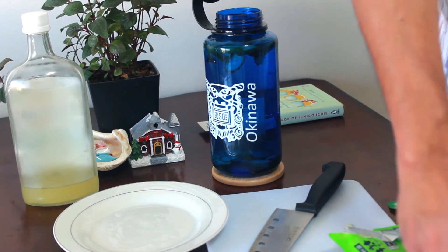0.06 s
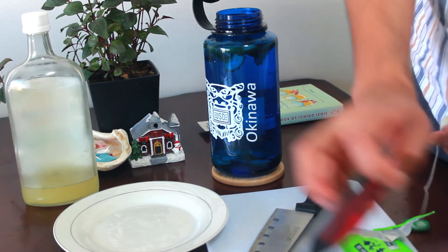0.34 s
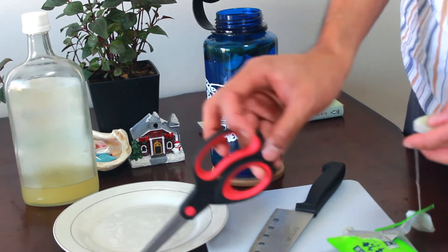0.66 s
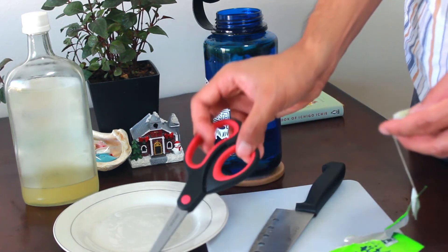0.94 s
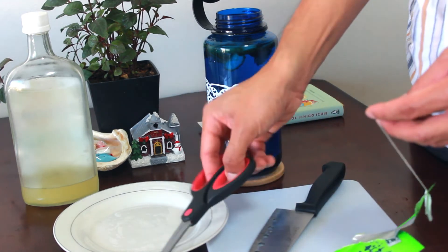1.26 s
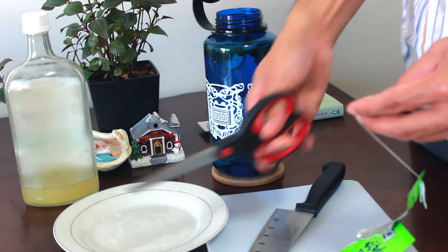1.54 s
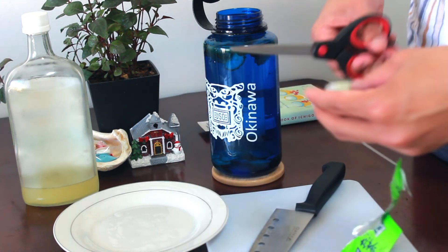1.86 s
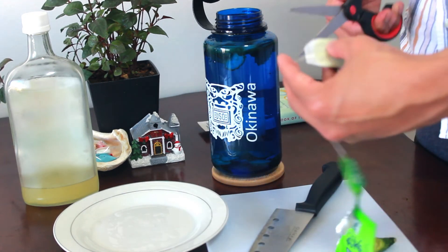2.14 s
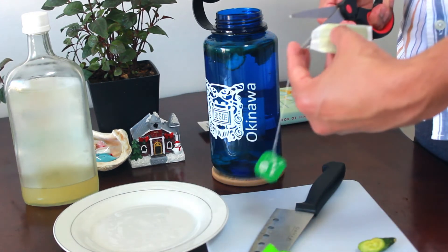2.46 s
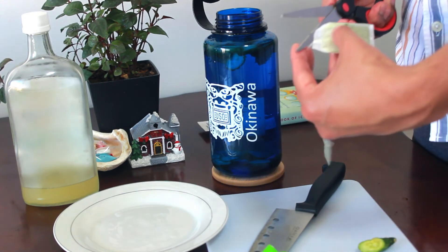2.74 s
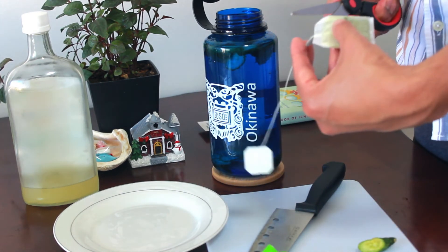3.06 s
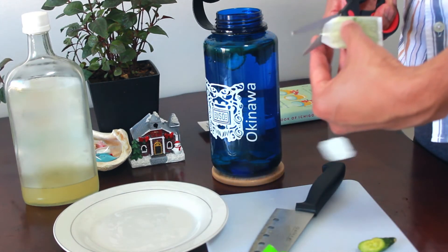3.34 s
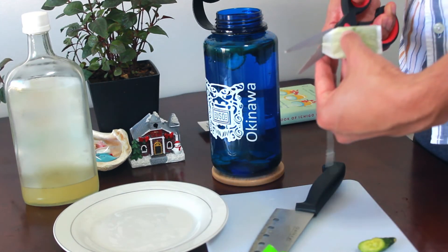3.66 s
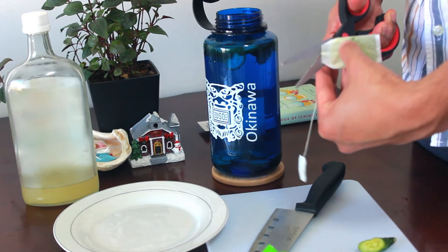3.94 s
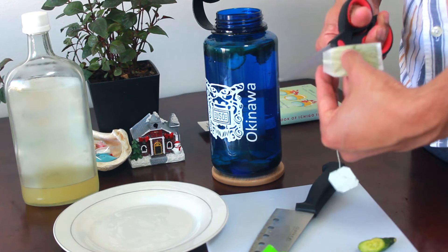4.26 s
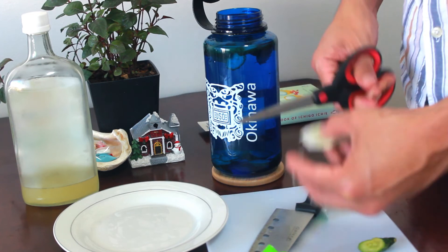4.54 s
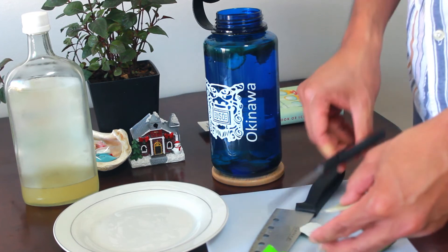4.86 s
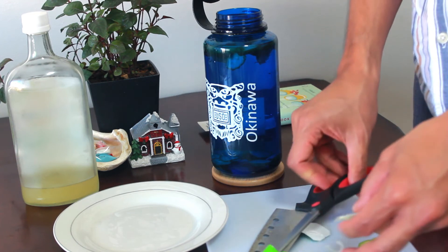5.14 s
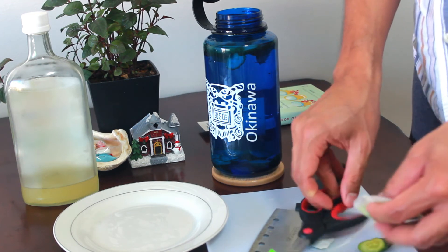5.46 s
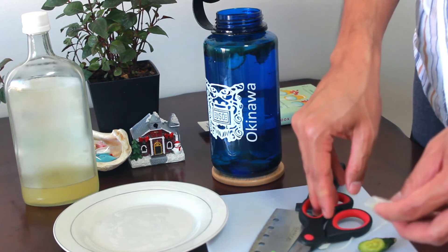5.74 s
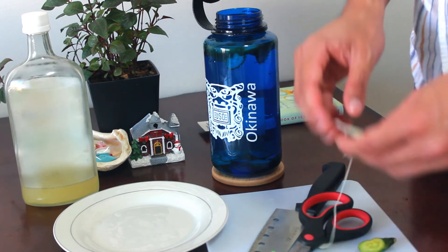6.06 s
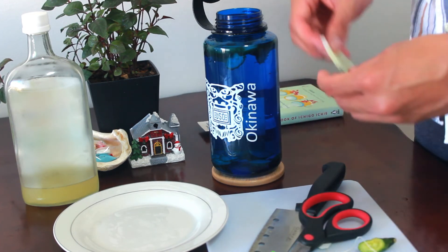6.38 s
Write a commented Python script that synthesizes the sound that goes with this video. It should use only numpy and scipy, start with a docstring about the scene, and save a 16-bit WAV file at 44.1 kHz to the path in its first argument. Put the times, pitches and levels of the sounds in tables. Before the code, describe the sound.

A low hum and soft air fill a small, fairly live room, heard from a close microphone. Right at the start, kitchen scissors knock on a wooden table and are dragged off it with rubbing scrapes that swell. At about 0.7 seconds their tip strikes the rim of a china plate with a bright, ringing clink, the loudest sound, followed by a soft bump and a duller, quieter clink at 1.2 seconds. Between 2 and 2.5 seconds the blades make a few short, light snips at a tea bag's string. After a pause, fainter strokes and ticks come from about 4.1 to 5.2 seconds. At 5.3 seconds the scissors are laid on a plastic cutting board: the steel blades clack, ring briefly and skid, and the handles drop with a click near 5.6 seconds. From 5.8 seconds to the end at about 6.5, the hum climbs and brightens.

```python
"""A low hum and soft air fill a small, fairly live room; one microphone is close by.
Kitchen scissors knock on a wooden table and are dragged off it, with rubbing scrapes that swell.
Their tip clinks twice on a china plate, rim then well, and from 2 s the edges snip a tea bag's string.
After a few fainter strokes they are laid on a plastic cutting board at 5.3 s: the steel blades
land, ring and skid, then the handles drop. At the very end the hum climbs and brightens."""
import sys
import numpy as np
from scipy import signal
from scipy.fft import rfft, irfft
from scipy.io import wavfile
from scipy.ndimage import uniform_filter1d

SR = 44100
rng = np.random.default_rng(int(sys.argv[2]) if len(sys.argv) > 2 else 0)


def materialize(psi):
    """Save the field psi as 16-bit PCM at rate SR to the path in sys.argv[1].

    A 1-D psi becomes a single channel; in a 2-D psi each row is a channel.
    """
    bounded = np.clip(np.atleast_2d(psi).T, -1, 1)
    quanta = np.round(bounded * 32767).astype(np.int16)
    wavfile.write(sys.argv[1], SR, quanta)


N = 287045
TIME = np.arange(N) / SR
AGE = TIME[:SR]  # the second that follows a blow

# The room's tail. Each row: frequency in Hz, time to fall 60 dB (t60) in seconds.
ROOM_DECAY = [(100, .55), (400, .62), (1200, .6), (3000, .57), (6000, .52), (10000, .43), (16000, .32)]
# Tone of the room air. Each row: frequency in Hz, relative level in dB.
AIR_COLOUR = [(20, -26.5), (40, -19.5), (62, -9), (85, -14), (135, -6.5), (195, -9), (280, -8.5),
              (370, -9.5), (700, -11), (850, -12.5), (1330, -14), (2320, -20.5), (9400, -32.5),
              (16000, -41)]
# The hum's slow swell. Each row: time in seconds, level in dB before the hum's gain.
HUM_SWELL = [(0.9, -63), (1.26, -63.5), (2.51, -63), (3.25, -65.5), (4.28, -55.5), (5.41, -58),
             (5.95, -57.5), (6.5, -56)]
# The hum's overtones. Each row: multiple of the fundamental, relative level in dB.
HUM_HARMONICS = [(2, -1.5), (3, 0), (4, -13.5), (5, -11), (6, -8.5), (7, -11.5)]
# Tone of each kind of contact, by name. Each row: frequency in Hz, relative level in dB.
CONTACT_COLOURS = { "rim": [(40, -45), (120, -27), (300, -10), (900, -7.5), (1600, -8.5), (2250, -8),
                   (3000, 2.5), (6500, -7), (7400, -10.5), (12000, -18), (16000, -21)], "well": [(60, -14),
                   (170, -19), (260, 6.5), (420, 0), (700, -6.5), (1000, -2), (1450, 7.5), (2000, 2),
                   (2400, -6), (3400, -8.5), (5000, -5), (6600, -12.5), (8000, -21), (11500, -28),
                   (15000, -51)], "blade": [(50, -37), (100, -11), (160, -18), (270, -2.5), (600, -15),
                   (950, -6.5), (1500, -12.5), (1900, 5.5), (2400, 8.5), (3400, -4), (4800, 1), (5300, 4),
                   (7200, -6), (10000, -11), (13300, -9), (16000, -17)], "skid": [(80, -10), (280, -23),
                   (1000, -6.5), (1550, -13.5), (2300, 8), (3400, -5.5), (4100, -1.5), (4500, -17),
                   (6400, -1.5), (8500, -15), (11000, -16), (13300, -13), (16000, -29)],
                   "handle": [(50, -13), (130, 2.5), (550, 0.5), (920, 9.5), (1550, 7), (2000, 7.5),
                   (2600, 15), (3200, -1), (3900, 5.5), (4400, -1.5), (6500, -5), (9000, -8), (16000, -34)],
                   "table": [(40, -16.5), (80, -6.5), (190, 4), (330, -8.5), (600, 7), (800, -8.5),
                   (1050, 4.5), (2200, -7), (4500, -12.5), (7500, -17), (11000, -27), (16000, -36.5)],
                   "shear": [(300, -33), (2300, -16), (3400, -9), (4100, -2), (5200, -8.5), (7000, -0.5),
                   (10000, -4.5), (14000, -6), (16000, -25.5)], "string": [(200, -7), (900, -9), (1400, 7),
                   (1900, 1.5), (2400, -7), (3300, 5), (4400, -3.5), (7000, -5), (9000, -14.5),
                   (16000, -24)]}
# The ring of the steel blades. Each row: frequency in Hz, relative level in dB, t60 in seconds.
BLADE_MODES = [(2235, -10, .025), (2340, -15, .04), (2570, -14, .04), (3190, -14, .07), (3760, -11, .09),
               (3960, -12, .05), (4210, -15, .06), (4780, 0, .028), (4850, -7, .07), (5700, -1.5, .11),
               (5810, -4, .025), (6848, 0, .11), (7150, -11, .04), (7730, -19, .12), (8122, -7, .14),
               (9605, -7, .11), (11300, -19, .11), (13400, -19, .05)]
# Scissors hitting table and board. Each row: start in seconds, kind of contact, crack level in dB,
# crack t60 in seconds, blade ring level in dB.
KNOCK_CUES = [(0, "table", -43.5, 0.053, -74), (0.0165, "table", -48, 0.008, -59),
              (0.0201, "table", -30, 0.013, -49.5), (5.0907, "table", -50, .03, -84),
              (5.3218, "blade", -22, 0.0089, -29), (5.3229, "blade", -30, 0.039, -21),
              (5.5698, "handle", -29.5, 0.0041, -35.5)]
# Soft bumps of hand, table and board, and ticks of the handles.
# Each row: start in seconds, centre frequency in Hz, level in dB, t60 in seconds.
BUMP_CUES = [(0.023, 139, -35.5, 0.34), (.035, 86, -52, .15), (0.811, 255, -40.5, 0.2),
             (1.257, 1450, -40.5, 0.046), (4.5442, 2070, -53.5, 0.013), (4.5442, 3370, -56.5, .01),
             (4.763, 3800, -54, 0.13), (5.275, 7960, -58.5, .05), (5.333, 257, -40, 0.22)]
# Rubbing scrapes of the scissors. Each row: start of the hold in seconds,
# its length in seconds, relative level in dB, extra level for the upper scrape in dB.
RUB_CUES = [(0.189, 0.066, -49, 5.5), (.385, 0.031, -47.5, -0.5), (.47, 0.027, -39, -1.5),
            (.535, 0.046, -35.5, -2), (.61, 0.075, -36.5, 2), (.825, .015, -44.5, 1)]
# The rubbing's low body and its upper, hissy scrape. Each row: frequency in Hz, relative level in dB.
RUB_BODY = [(100, -40.5), (190, -15.5), (270, -7), (420, -11.5), (560, -1), (700, -0.5), (900, -9.5),
            (1500, -50)]
RUB_SCRAPE = [(600, -22), (950, 12.5), (1200, 8.5), (1550, 1.5), (2250, 1.5), (2800, -3.5), (5500, -10.5),
              (9000, -20), (15000, -40)]
# The ring of the china plate, partly in close pairs. Each row: frequency in Hz,
# level in dB when struck at the rim, level in dB when struck in the well, t60 in seconds.
PLATE_MODES = [(1955, -19, -40, .45), (2720, -18, -35, .38), (3158, -13, -50, .22), (4215, -19, -42, .05),
               (4260, -17.5, -35, .17), (4530, -27, -41, .11), (5292, -33, -47, .16), (5400, -27, -42, .34),
               (5462, -40, -38, .22), (6044, -20, -48, .09), (6098, -32, -38, .14), (6490, -28, -55, .06),
               (6562, -23.5, -48, .1), (7076, -35, -50, .16), (7677, -35, -52, .14), (8892, -32, -62, .13),
               (8974, -48, -52, .13), (9513, -30, -53, .24), (9615, -40, -57, .22), (10055, -44, -61, .16),
               (10910, -37, -60, .07), (11510, -39, -62, .2), (11760, -39, -70, .05),
               (13190, -38, -58, .14), (13716, -35, -69, .12)]
# Blade tip on the plate. Each row: start in seconds, place, crack level in dB, crack t60 in seconds.
CLINK_CUES = [(.658, "rim", -16.5, .014), (1.1898, "well", -28.5, 0.028)]
# Cutting strokes. Each row: peak time in seconds, kind of contact, level in dB,
# time constant of rise and fall in seconds.
SNIP_CUES = [(1.988, "string", -52.5, 0.01), (2.0698, "shear", -37.5, 0.0024),
             (2.4515, "string", -38.5, .003), (2.463, "string", -42.5, 0.0035),
             (4.119, "shear", -63, 0.0071), (4.209, "shear", -57, .015), (4.435, "string", -61, .0023),
             (4.672, "shear", -61.5, .01), (5.226, "string", -53, 0.011), (5.259, "string", -48, .01)]
# The blades skid lightly on the board, then bite just before they stop.
# Each row: start of the hold in seconds, its length in seconds, relative level in dB.
SKID_CUES = [(5.342, 0.017, -32), (5.38, .045, -32.5), (5.441, 0.0022, -18.5)]


def undb(db):
    """Decibels to gain."""
    return 10 ** (np.asarray(db) / 20)


def fade(t60):
    """The decay after a blow: 60 dB down in t60 seconds."""
    return np.exp(-np.log(1000) * AGE / t60)


def level(x, db):
    """Set the rms level."""
    return x * undb(db) / np.sqrt(np.mean(x ** 2))


def blow(x, db):
    """Give a short sound the energy of 10 ms at this level."""
    return x * undb(db) / np.sqrt(np.sum(x ** 2) / (SR / 100))


def colour(x, points, size=4096):
    """EQ through (Hz, dB) points; minimum phase keeps attacks sharp."""
    hz, db = np.transpose(points)
    bins = np.arange(1, size // 2 + 2) * SR / size
    gains = undb(np.interp(np.log(bins), np.log(hz), db))
    cepstrum = irfft(np.log(gains))
    cepstrum[1:size // 2] *= 2
    cepstrum[size // 2 + 1:] = 0
    return signal.fftconvolve(x, irfft(np.exp(rfft(cepstrum))))[:len(x)]


def add(out, start, x):
    """Mix a sound in at a start time in seconds."""
    first = max(int(start * SR), 0)
    out[first:first + len(x)] += x[:N - first]


def wander(rate_hz):
    """Smooth random drift with a spread near 1."""
    hold = int(SR / rate_hz)
    steps = np.repeat(rng.standard_normal(N // hold + 1), hold)[:N]
    return uniform_filter1d(steps, hold)


def room(early_db=3, early_t60=.08, gap_s=.004):
    """Reflections off nearby things, then a diffuse tail whose treble dies first."""
    hz, t60s = np.transpose(ROOM_DECAY)
    noise = rfft(rng.standard_normal(SR))
    log_hz = np.log(np.arange(len(noise)) + 1)
    bands = [irfft(noise * np.interp(log_hz, np.log(hz), share), SR) for share in np.eye(len(hz))]
    tail = sum(band * fade(t60) for band, t60 in zip(bands, t60s))
    onset = 1 - np.exp(-(AGE / gap_s) ** 2)
    return tail * (1 + undb(early_db) * fade(early_t60)) * onset


def in_room(x, walls, wet_db):
    """A sound together with its reverb."""
    echo = signal.fftconvolve(x, walls)[:len(x)]
    return x + echo * undb(wet_db) * np.std(x) / np.std(echo)


def room_air(swell_db, follow_share=.14):
    """A soft bed of noise that breathes a little with the hum's swell."""
    bed = level(colour(rng.standard_normal(N), AIR_COLOUR), db=-54)
    return bed * undb(follow_share * (swell_db - swell_db.mean()) + .35 * wander(12))


def hum(swell_db, fundamental_hz=45.4, climb_from_s=5.8, climb_hz_per_s=3.4, gain_db=2.5):
    """A low, wavering stack of overtones that brightens as its pitch climbs at the end."""
    climb_hz = climb_hz_per_s * np.maximum(TIME - climb_from_s, 0)
    pitch_hz = (fundamental_hz + climb_hz) * (1 + .0052 * wander(4.7))
    phase = 2 * np.pi * np.cumsum(pitch_hz) / SR
    tilt_db = -.54 + 1.44 * climb_hz  # per harmonic, pivoting on the fourth
    tone = np.zeros(N)
    for multiple, db in HUM_HARMONICS:
        gain = undb(db + tilt_db * (multiple - 4) + 3.2 * wander(8.1))
        tone += gain * np.sin(multiple * phase + rng.uniform(0, 2 * np.pi) + .35 * wander(12))
    return level(tone, gain_db) * undb(swell_db)


def mode(hz, t60, walls, wet_db):
    """One ringing mode and its afterglow in the room."""
    ring = rng.choice([-1, 1]) * np.sin(2 * np.pi * hz * AGE) * fade(t60)
    return blow(in_room(ring, walls, wet_db), 0)


def blade_ring(walls):
    """Struck steel: all the blades' modes sound at once, bright and short."""
    return blow(sum(undb(db) * mode(hz, t60, walls, wet_db=-13) for hz, db, t60 in BLADE_MODES), 0)


def contact(kind, db, t60, tick_db=-2):
    """The crack of two things meeting: one sharp tick, then a brief chatter."""
    chatter = blow(rng.standard_normal(SR) * fade(t60), 0)
    tick = blow(1. * (AGE == 0), tick_db)
    return blow(colour(tick + chatter, CONTACT_COLOURS[kind]), db)


def knocks(walls, blades):
    """Each knock on table or board cracks and sets the blades ringing."""
    out = np.zeros(N)
    for start, kind, db, t60, ring_db in KNOCK_CUES:
        crack = in_room(contact(kind, db, t60), walls, wet_db=-1.5 if kind == "blade" else 2.5)
        add(out, start, crack + undb(ring_db) * blades)
    return out


def bumps(walls, width_share=.21):
    """Small handling sounds, each a dying puff of noise in one damped resonance."""
    out = np.zeros(N)
    for start, hz, db, t60 in BUMP_CUES:
        width_hz = width_share * hz
        band = signal.butter(2, [hz - width_hz / 2, hz + width_hz / 2], "band", fs=SR, output="sos")
        bump = signal.sosfilt(band, rng.standard_normal(SR) * fade(t60))
        add(out, start, in_room(blow(bump, db), walls, wet_db=-6.5))
    return out


def grains(count, spread_db):
    """Friction: a dense run of tiny slips of uneven size, 16 samples each."""
    sizes = np.repeat(rng.standard_normal(count // 16 + 1), 16)[:count]
    return rng.standard_normal(count) * undb(spread_db * sizes)


def strokes(cues, rise_db_per_s, fall_db_per_s):
    """Rubbing force: each stroke swells, holds and lets go; the strongest one rules."""
    levels_db = []
    for start, held, db in cues:
        attack_db = rise_db_per_s * np.maximum(start - TIME, 0)
        release_db = fall_db_per_s * np.maximum(TIME - start - held, 0)
        levels_db.append(db - attack_db - release_db)
    return undb(np.max(levels_db, axis=0))


def rubs(walls, rise_db_per_s=173, fall_db_per_s=269.5):
    """Rubbing scrapes of the scissors swell up to the first clink, then comes one brief, softer rub."""
    body = level(colour(grains(N, spread_db=1.5), RUB_BODY), db=-5)
    scrape = level(colour(grains(N, spread_db=4), RUB_SCRAPE), db=-4.5)
    body_cues = [(start, held, db) for start, held, db, _ in RUB_CUES]
    scrape_cues = [(start, held, db + extra_db) for start, held, db, extra_db in RUB_CUES]
    body *= strokes(body_cues, rise_db_per_s, fall_db_per_s)
    scrape *= strokes(scrape_cues, rise_db_per_s, fall_db_per_s)
    return in_room(body + scrape, walls, wet_db=2.5)


def plate_clinks(walls):
    """Steel on china: where the tip lands decides how strongly each mode rings."""
    out = np.zeros(N)
    for start, place, db, t60 in CLINK_CUES:
        on_rim = place == "rim"
        ring = sum(undb(rim_db if on_rim else well_db) * mode(hz, ring_t60, walls, wet_db=-4)
                   for hz, rim_db, well_db, ring_t60 in PLATE_MODES)
        crack = in_room(contact(place, db, t60), walls, wet_db=-6 if on_rim else 1)
        add(out, start, crack + ring)
    return out


def snips(walls, lead_s=.1):
    """The edges shear past each other: a gritty burst that builds up and lets go."""
    out = np.zeros(N)
    for peak, kind, db, rise in SNIP_CUES:
        pressure = np.exp(-np.abs(AGE - lead_s) / rise) * (AGE > lead_s - 2 * rise)
        grit = colour(grains(SR, spread_db=-3) * pressure, CONTACT_COLOURS[kind])
        add(out, peak - lead_s, in_room(blow(grit, db), walls, wet_db=-3))
    return out


def skid(walls, blades, singing_db=-4.5, rasp_db=-2.5):
    """Once landed, the blades rasp over the board and friction keeps their modes singing."""
    landed = TIME > min(start for start, kind, *_ in KNOCK_CUES if kind == "blade")
    force = strokes(SKID_CUES, rise_db_per_s=750, fall_db_per_s=1300) * landed
    slips = grains(N, spread_db=0) * force
    singing = signal.fftconvolve(slips, blades / np.linalg.norm(blades))[:N]
    rasp = in_room(colour(slips, CONTACT_COLOURS["skid"]), walls, wet_db=1.5)
    return undb(singing_db) * singing + undb(rasp_db) * rasp


def scene():
    """China, steel and handling share one room, in mono over the air and hum."""
    walls = room()
    china = plate_clinks(walls)
    blades = blade_ring(walls)
    steel = knocks(walls, blades) + skid(walls, blades) + snips(walls)
    handling = bumps(walls) + rubs(walls)
    swell_db = np.interp(TIME, *np.transpose(HUM_SWELL))
    return (china + steel + handling + room_air(swell_db) + hum(swell_db))[None]


def record(dry, top_hz=16200):
    """Clip at full scale, then cut the very top steeply."""
    lowpass = signal.ellip(10, .1, 80, top_hz, fs=SR, output="sos")
    return signal.sosfilt(lowpass, np.clip(dry, -1, 1))


dry = scene()
out = record(dry)
materialize(out)
```